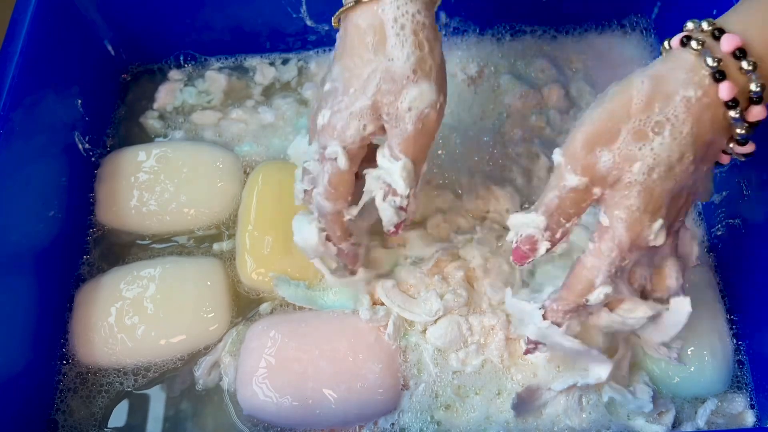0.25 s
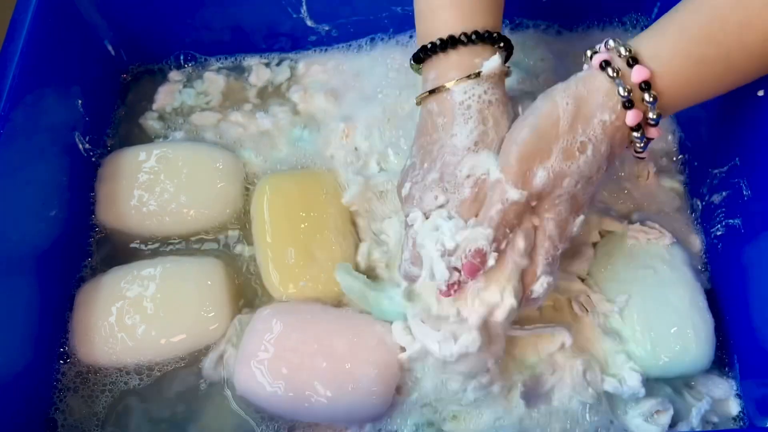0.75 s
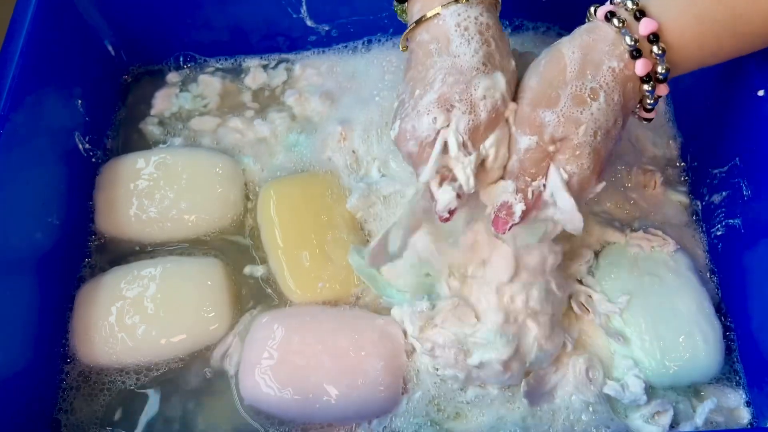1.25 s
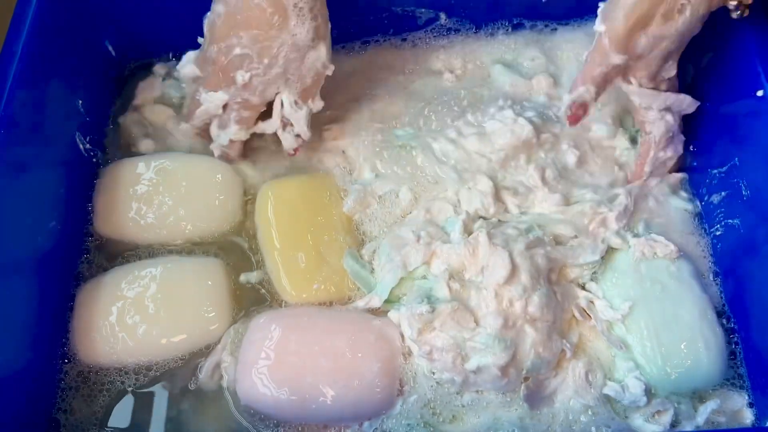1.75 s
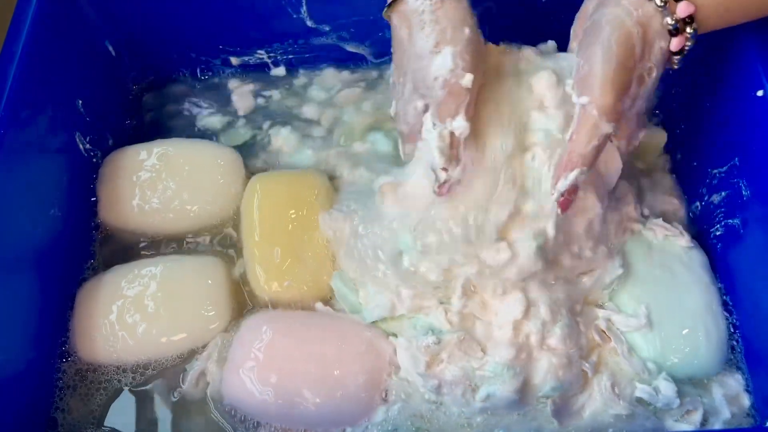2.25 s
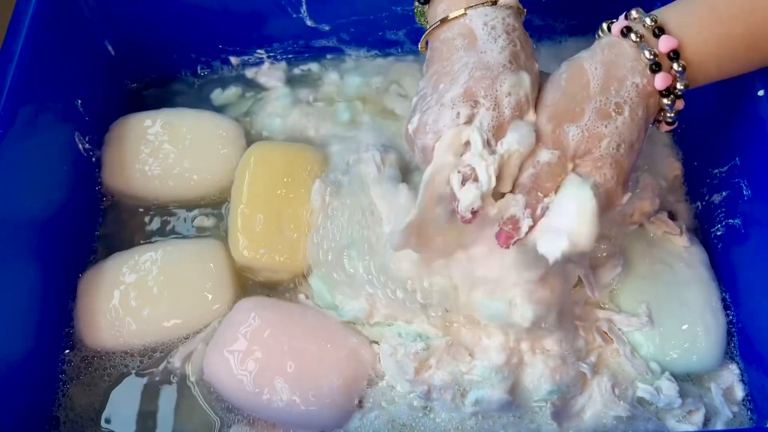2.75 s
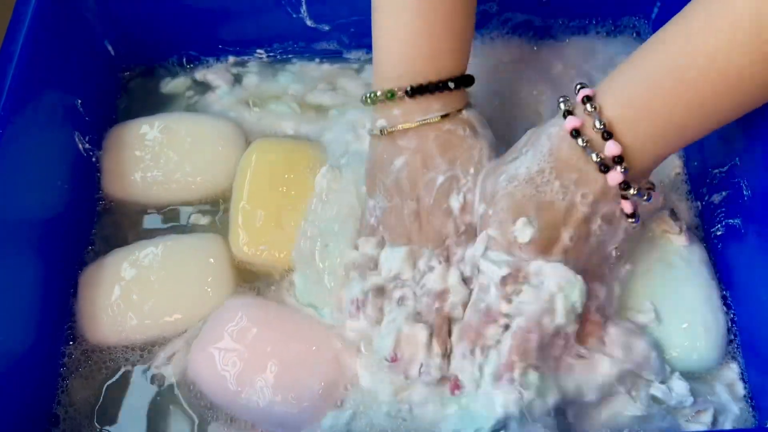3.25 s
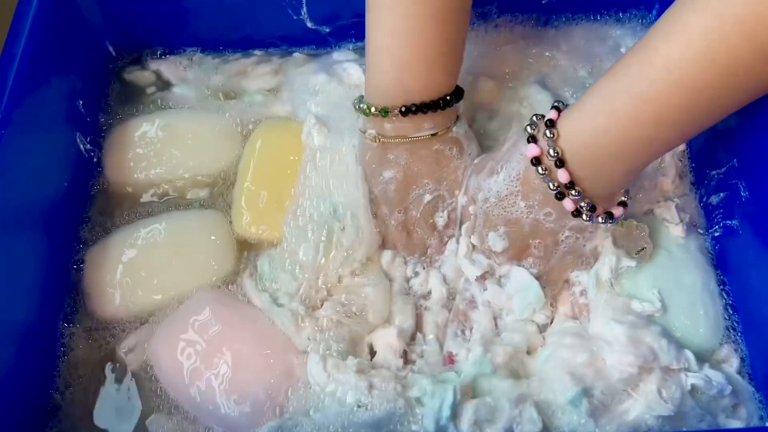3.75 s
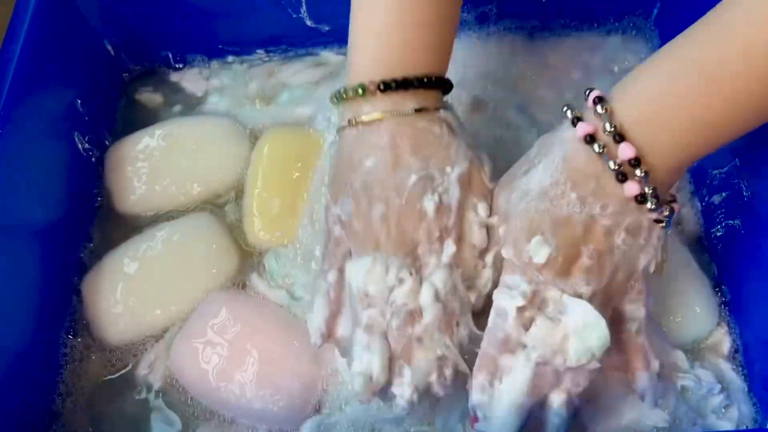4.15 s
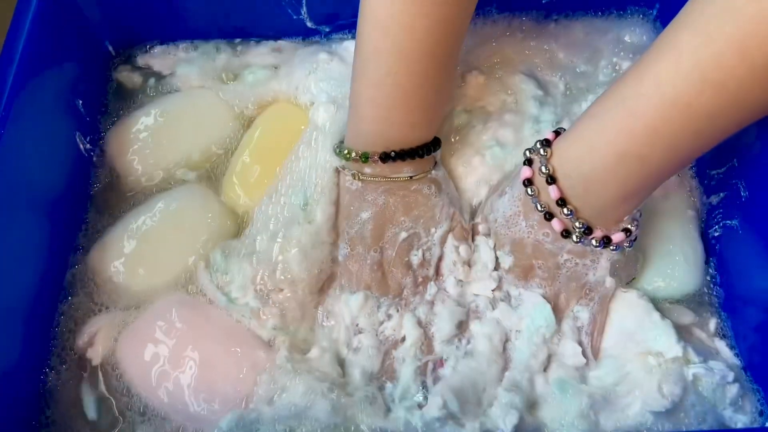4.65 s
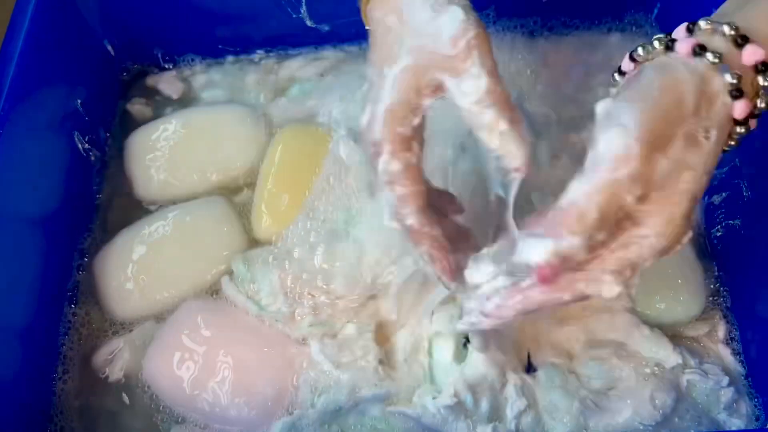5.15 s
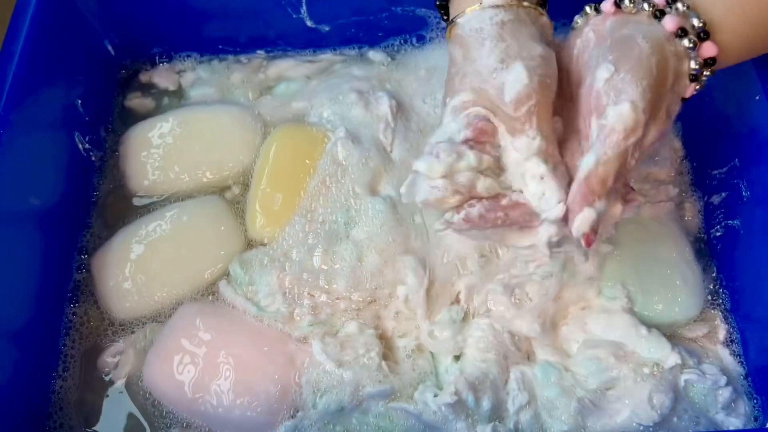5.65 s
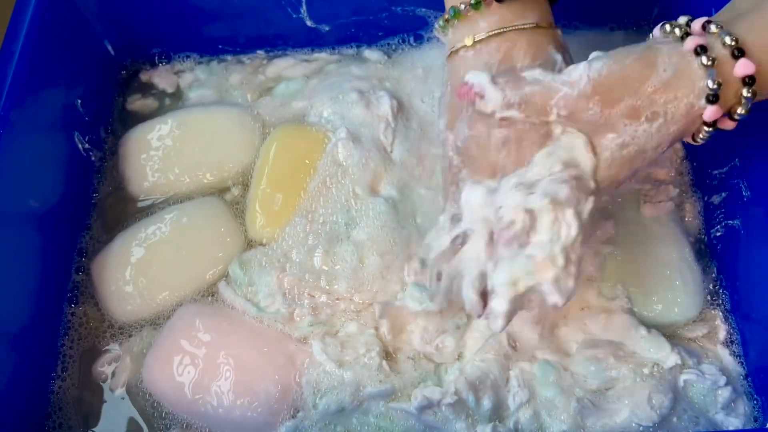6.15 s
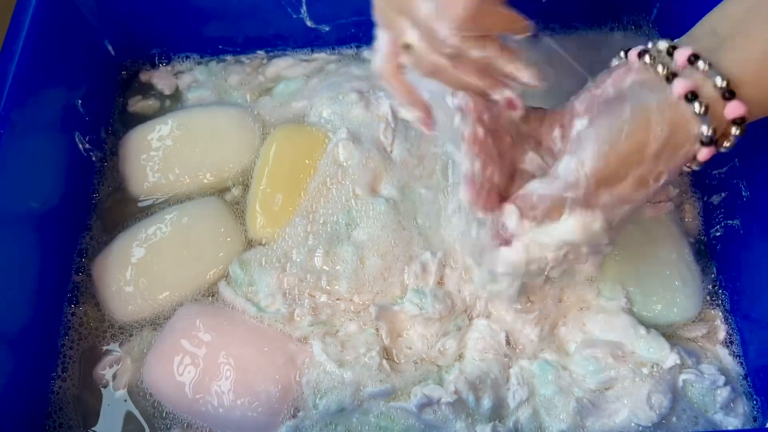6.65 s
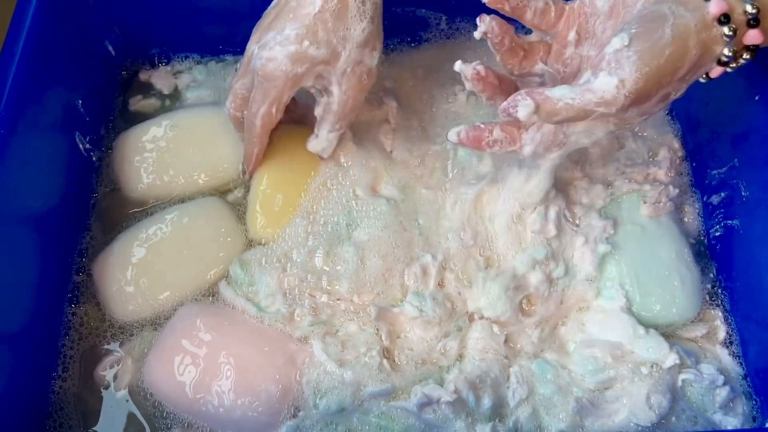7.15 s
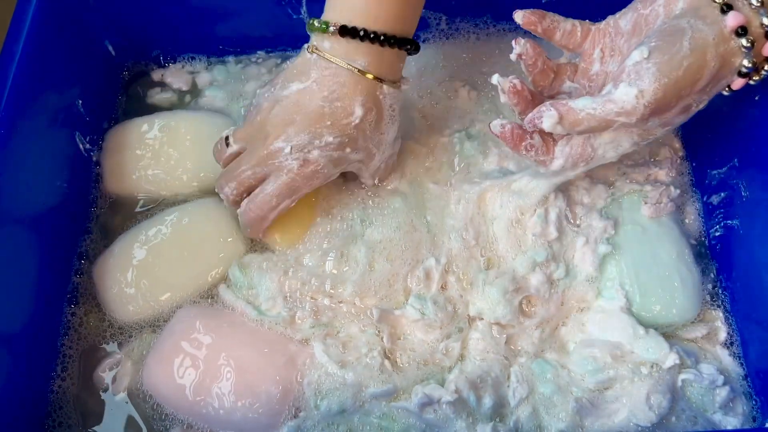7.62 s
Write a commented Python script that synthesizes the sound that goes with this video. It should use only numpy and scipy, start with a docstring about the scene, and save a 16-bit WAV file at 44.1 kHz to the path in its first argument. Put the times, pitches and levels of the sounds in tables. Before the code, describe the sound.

Close stereo sound of soft soap paste being scooped, squeezed and dropped into soapy water. Juicy squishes and brittle foam crackles rise and fall with each grip, peppered with snapping bubbles and hollow glugs. Low thumps and sloshes resound in the plastic tub, strongest near 1.7 and 4.1 seconds. After five seconds it turns drier and quieter, with one last wet burst near 6.8 and a low, soft slide at the end, in a short hard room echo.

```python
"""Hands in a tub of soap suds

Two hands scoop, squeeze and drop soaked soap in a plastic tub of suds, close to the microphone in a small hard room.
Trapped air pops: noise bursts excite resonators. The paste squelches and the foam crackles: clumps of tiny rings.
Large bubbles and two clear lingering notes are damped tones; lumps thud through tub modes; a bar slides late on.
Water sloshes and booms as noise in those resonances and deeper ones, over wall echoes, a faint rumble and hiss."""
import sys
import numpy as np
from scipy import signal
from scipy.fft import rfft, irfft
from scipy.io import wavfile
from scipy.ndimage import uniform_filter1d

SR = 44100
rng = np.random.default_rng(int(sys.argv[2]) if len(sys.argv) > 2 else 0)


def inscribe(sig):
    """Save sig as 16-bit PCM at rate SR to the path in sys.argv[1].

    A 1-D sig is mono; a 2-D sig holds one channel per row.
    Samples are clipped to [-1, 1] before scaling.
    """
    pcm = np.round(np.clip(np.atleast_2d(sig).T, -1, 1) * 32767)
    wavfile.write(sys.argv[1], SR, pcm.astype(np.int16))


N = 347508

# The loudest air pockets bursting; levels are rms over 5 ms, the tick before a lift of 0.5 dB.
# Columns: start_s, gulp_db, pocket_hz, pocket_db, tick_hz, tick_db
LOUD_POPS = [(0.0549, -64, 2490, -59.5, 7690, -55.5), (0.0785, -62.5, 2820, -56.5, 7100, -78),
             (0.4283, -47, 2120, -44, 5510, -51), (0.5133, -56, 2840, -54, 8000, -47.5),
             (0.5622, -51, 1750, -47, 7440, -62), (0.6235, -60, 2600, -44, 6620, -64),
             (0.642, -58.5, 2760, -48.5, 5730, -65), (0.674, -71, 2600, -45, 4800, -59.5),
             (0.7627, -50, 2360, -54.5, 6490, -68), (0.8367, -45.5, 1490, -40.5, 6070, -43.5),
             (0.9409, -52, 1950, -51, 7230, -45.5), (0.9806, -51, 2850, -74.5, 9430, -40.5),
             (1.0156, -46.5, 2680, -50, 9580, -38), (1.109, -53.5, 4420, -48, 7430, -47),
             (1.1397, -65.5, 2910, -57.5, 8160, -37), (1.1485, -54, 2320, -40.5, 7750, -34),
             (1.307, -63, 3340, -56.5, 9970, -50), (1.3854, -89.5, 4500, -54.5, 8070, -49.5),
             (1.4168, -90, 3620, -57.5, 6720, -52), (1.496, -92, 2450, -66.5, 10500, -49.5),
             (1.5925, -39.5, 2750, -35, 6830, -41.5), (1.66, -75, 2430, -58, 5910, -47.5),
             (1.7048, -57, 3100, -43, 10480, -39.5), (1.7681, -43, 3000, -46.5, 5930, -44),
             (1.8908, -49, 1580, -58, 6290, -59.5), (2.19, -53, 2010, -58.5, 7600, -78),
             (2.3322, -64.5, 2180, -59.5, 6950, -63), (2.3646, -58, 2210, -50.5, 8050, -48),
             (2.425, -55, 2530, -52.5, 10320, -47.5), (2.4634, -62, 2010, -52, 9930, -50.5),
             (2.5386, -61, 2980, -48, 5050, -81), (2.7984, -67, 1760, -55, 4610, -80),
             (2.5462, -57.5, 3280, -52, 4970, -82), (2.8217, -73, 1730, -49.5, 6230, -78),
             (2.851, -56, 2580, -50.5, 9240, -47.5), (2.9638, -89, 3320, -59, 9590, -53.5),
             (3.118, -82, 3470, -57.5, 10820, -43.5), (3.1592, -66, 2650, -57, 10820, -47),
             (3.2575, -47, 2470, -43.5, 5280, -51), (3.3374, -59, 3020, -48, 10190, -40),
             (3.4078, -54.5, 2900, -49.5, 9780, -45), (3.508, -71, 3200, -48, 6680, -50),
             (3.7925, -47, 2410, -44.5, 5500, -44), (3.514, -75, 3210, -57, 10700, -44),
             (3.578, -56, 2940, -53, 5360, -62), (3.8752, -69.5, 3400, -65, 7690, -49),
             (3.983, -59, 2040, -72, 10420, -61.5), (4.0994, -88, 3930, -62, 6780, -53.5),
             (4.1281, -32, 2300, -34, 6390, -43.5), (4.1336, -37, 1970, -54, 7060, -46),
             (4.2523, -39.5, 1770, -51, 9280, -50), (4.366, -47.5, 2380, -43.5, 5170, -51.5),
             (4.4372, -41, 1800, -43, 9710, -41.5), (4.399, -67, 2780, -46.5, 5110, -58),
             (4.4461, -47, 2220, -47, 6850, -69), (4.5025, -52.5, 2720, -45, 7550, -45),
             (4.7115, -75, 3130, -60, 6860, -57.5), (4.8158, -43, 1560, -46, 8700, -48.5),
             (4.827, -52, 1620, -47.5, 6440, -59), (4.9085, -45.5, 2520, -41.5, 10400, -41),
             (4.9525, -51, 2600, -37, 8900, -39.5), (5.2102, -72.5, 2660, -69.5, 6120, -63),
             (5.3028, -74.5, 2590, -67.5, 10130, -58.5), (5.3605, -72, 2940, -54.5, 10380, -43.5),
             (5.5324, -93, 2800, -55.5, 6060, -46), (5.6154, -77.5, 2030, -62, 8440, -54),
             (5.6774, -79, 2560, -66, 10400, -50.5), (5.7654, -83.5, 2290, -55, 6430, -58.5),
             (5.828, -90, 3200, -62, 7990, -61.5), (5.8815, -77, 3000, -57.5, 6690, -62.5),
             (5.9385, -75.5, 2550, -43.5, 6950, -42), (5.9463, -61.5, 2360, -50, 6860, -32),
             (6.1583, -89, 2410, -62.5, 9900, -48.5), (6.146, -86, 3240, -67, 9590, -52),
             (6.3174, -82, 3180, -57, 6540, -48.5), (6.3511, -63.5, 1550, -56, 6660, -73),
             (6.5529, -69, 3560, -56, 5960, -69), (6.37, -77, 2810, -68, 8040, -57),
             (6.5608, -82, 4300, -60.5, 9700, -46), (6.6486, -79, 4100, -61, 8830, -53),
             (6.7162, -53, 3750, -50.5, 6900, -52), (6.7243, -50, 1610, -47, 6200, -52),
             (6.8281, -44.5, 3000, -40, 6290, -51), (7.044, -62, 2220, -65, 6500, -76)]

# Lesser pops at chance moments: how often, and their levels relative to the kneading (tick before the same lift)
STRAYS_PER_S, STRAY_SPREAD_DB = 13, 1
STRAY_GULP_DB, STRAY_POCKET_DB, STRAY_TICK_DB = 2.5, 4, 4.0
STRAY_POCKET_HZ, STRAY_TICK_HZ, STRAY_SPREAD_OCTAVES = 2600, 7600, 0.33

# Each grip on the mush: digging in, scooping, pressing, then wiping the paste off the fingers.
# Columns: start_s, closing_s, hold_s, squelch_db, paste_db, foam_db
GRIPS = [(0.0, 0.0023, 0.11, -76, -71.5, -66.5), (0.212, 0.047, 0.14, -65.5, -59, -56.5),
         (0.411, 0.019, 0.11, -55, -58, -55), (0.535, 0.022, 0.42, -56, -55.5, -53),
         (0.956, 0.039, 0.17, -58, -60.5, -57.5), (1.251, 0.031, 0.15, -85, -73, -59.5),
         (1.451, 0.011, .12, -65.5, -64.5, -58.5), (1.591, 0.0084, 0.046, -53, -53.5, -60.5),
         (1.68, 0.015, 0.12, -51, -58.5, -54), (1.864, 0.022, 0.23, -60, -64, -66),
         (2.175, 0.008, 0.018, -63, -66, -81), (2.347, 0.016, 0.1, -65, -63.5, -59.5),
         (2.515, 0.047, 0.087, -65, -63, -62), (2.692, 0.038, 0.077, -60.5, -67, -78),
         (2.85, 0.079, 0.11, -76, -70.5, -63.5), (3.028, 0.0071, 0.39, -66, -66.5, -67),
         (3.164, 0.066, 0.12, -54, -52, -53.5), (3.367, 0.012, 0.036, -61, -60, -59),
         (3.468, 0.021, 0.022, -69, -62, -58.5), (3.544, 0.019, 0.012, -61, -61, -75.5),
         (3.779, 0.016, 0.072, -57.5, -59.5, -57.5), (3.907, 0.022, 0.018, -65.5, -70.5, -76),
         (4.131, .006, .11, -50.5, -55, -58), (4.247, 0.04, 0.082, -50, -53, -56.5),
         (4.43, 0.019, 0.056, -54, -56.5, -55), (4.543, 0.017, 0.044, -67, -69.5, -76.5),
         (4.712, 0.014, 0.091, -68.5, -73.5, -70.5), (4.798, 0.013, 0.18, -61.5, -58.5, -65.5),
         (5.088, 0.032, .02, -75, -72, -77.5), (5.285, 0.017, 0.079, -92, -77, -68.5),
         (5.476, 0.068, 0.016, -84.5, -70, -60), (5.60, .02, 0.2, -110, -78, -72.5),
         (5.852, 0.016, 0.032, -82, -63.5, -61.5), (5.943, 0.006, 0.029, -72.5, -60, -59),
         (6.057, 0.083, 0.099, -90, -72, -61), (6.329, .02, 0.055, -85, -74.5, -68),
         (6.535, 0.011, 0.051, -80, -76.5, -62.5), (6.618, 0.013, 0.067, -84, -78.5, -65.5),
         (6.71, 0.0057, 0.0054, -59.5, -61, -57.5), (6.816, .016, 0.044, -63, -59.5, -74),
         (6.91, 0.019, 0.12, -67.5, -72.5, -90)]
# The mush empties under the hand; all layers die once it opens
GRIP_SAG_DB_PER_S, GRIP_RELEASE_DB_PER_S = 16, 201
RESTING_DB = -96  # floor of each layer when the suds are left alone

# Relative strength of the bubbles by their pitch, in wet squelch, crumbling paste and foam.
# Columns: pitch_hz, level_db
SQUELCH_PITCHES = [(420, 7), (500, -12.5), (610, 13), (800, -0.5), (1050, 2.5), (1300, 1.5)]
PASTE_PITCHES = [(1300, 3.5), (1700, 3.5), (2200, 5.5), (2800, 2.5), (3500, 1.5), (4500, 0)]
FOAM_PITCHES = [(4500, 7.5), (6500, -12), (8500, 4.5), (10500, 5.5), (12000, -5.5)]

# Large bubbles ringing in the suds; level is rms over 5 ms, before a cut of 2 dB.
# Columns: start_s, pitch_hz, level_db
LARGE_BUBBLES = [(0.383, 1390, -56), (0.45, 540, -44), (0.578, 2810, -47), (0.637, 2800, -44),
                 (0.629, 2720, -37.5), (0.8391, 690, -42.5), (0.9115, 1300, -48), (0.4716, 3450, -52),
                 (0.592, 1800, -53), (0.99, 1190, -43.5), (1.058, 1170, -46), (1.071, 1255, -45),
                 (1.5934, 613, -37), (1.6208, 1820, -49.5), (1.7091, 593, -37.5), (1.771, 560, -33.5),
                 (1.8852, 3700, -51), (2.596, 3350, -56), (2.62, 1690, -53), (2.724, 656, -58),
                 (2.7482, 1520, -51.5), (3.2127, 830, -43.5), (3.2317, 780, -43.5), (3.2591, 684, -39.5),
                 (3.5744, 680, -54.5), (3.812, 820, -51), (3.8566, 1950, -57), (4.1503, 900, -43.5),
                 (4.1685, 900, -46.5), (4.2638, 774, -45), (4.2868, 820, -45.5), (4.3187, 1960, -44.5),
                 (4.8615, 1780, -42.5), (4.9597, 619, -50.5), (5.742, 3530, -61.5), (5.7561, 3670, -52.5),
                 (5.764, 2280, -45.5), (5.9477, 2050, -43.5), (6.7314, 1900, -50.5), (6.942, 600, -52.5)]
GLUG_CYCLES = 20  # a large bubble dies by 60 dB in about this many cycles
# Two clear notes that linger, perhaps a bangle ringing; level as for the large bubbles.
# Columns: start_s, pitch_hz, level_db, t60_s
LINGERING_NOTES = [(0.012, 1028, -57.5, 0.49), (6.831, 919, -42.5, 0.27)]

# Lumps and hands landing in the water; level is rms over 5 ms.
# Columns: start_s, pitch_hz, level_db
LANDINGS = [(0.381, 263, -44), (0.429, 280, -36.5), (0.839, 350, -39), (1.011, 230, -38), (1.695, 265, -27),
            (1.718, 224, -30.5), (1.767, 454, -37), (2.428, 250, -57), (3.575, 211, -48),
            (3.794, 245, -49.5), (4.131, 250, -29.5), (4.436, 356, -41), (4.873, 243, -43),
            (6.831, 255.4, -46)]

# A whole bar sliding under the hand: loudest moment, its level, and the time to lose 10 dB on either side
SLIDE_S, SLIDE_DB, SLIDE_FADE_S = 7.46, -72.5, 0.1

# Resonances of the filled tub and its deeper boom; levels are relative.
# Columns: mode_hz, width_hz, level_db
TUB_MODES = [(169.9, 15, 7), (197.2, 29.2, 3), (221.3, 45, 0), (273.8, 27, 1.5), (315, 23, -3),
             (353, 60, -9), (435, 13, -24.5)]
BOOM_MODES = [(62.7, 18, -11), (97.8, 6, 5.5), (123, 8.1, -19)]

# Each shove on the water.
# Columns: start_s, swell_s, slosh_db, boom_db
SHOVES = [(0.0, 0.0032, -70.5, -50.5), (0.375, 0.068, -45, -49), (0.52, 0.089, -52.5, -51.5),
          (0.81, 0.015, -63, -60), (0.995, 0.065, -55, -45.5), (1.205, 0.0097, -64.5, -66),
          (1.59, 0.0079, -50, -69), (1.695, 0.062, -38.5, -42.5), (1.98, 0.13, -55.5, -60),
          (2.38, 0.058, -51.5, -51.5), (2.72, 0.17, -72, -67), (3.18, 0.12, -55, -52.5),
          (3.40, 0.02, -57, -60), (3.55, 0.013, -63, -59), (3.76, 0.071, -51, -57.5),
          (4.128, 0.032, -41.5, -41), (4.29, 0.063, -51, -58), (4.46, 0.035, -54, -64),
          (4.77, 0.057, -50, -56.5), (4.87, 0.023, -58, -53), (5.465, 0.042, -73, -53),
          (5.94, 0.059, -75, -64), (6.03, .07, -88, -64), (6.829, 0.098, -63.5, -63),
          (7.201, 0.25, -64.5, -58.5), (7.399, 0.17, -72.5, -44.5)]
SLOSH_SETTLE_DB_PER_S, BOOM_SETTLE_DB_PER_S = 81.5, 67

# Room echo by frequency.
# Columns: frequency_hz, t60_s, echo_db
ROOM_ECHO = [(95, 0.56, 7), (235, 0.27, -6), (600, 0.32, -9), (1203, 0.26, -12.5), (3000, 0.27, -10),
             (7050, 0.28, -10.5), (12900, 0.055, -6)]

# Relative spectrum of the still room, then its overall rms level.
# Columns: frequency_hz, density_db_per_hz
STILL_AIR = [(20, -30.5), (33, -26), (40, -5.5), (47, 6), (66, -2.5), (80, -13), (98, -3), (130, -7),
             (200, -15.5), (400, -22), (1000, -38.5), (3000, -39.5), (7000, -39.5), (11000, -38.5),
             (14000, -39.5)]
STILL_AIR_DB = -68.5

# Phase lag of the right microphone port.
# Columns: frequency_hz, lag_rad
PORT_LAG = [(0, 0), (780, -0.6), (1030, -0.0), (2500, 0.1), (4310, 1.3), (5680, 6.3), (6720, 6.9),
            (8350, 9.2), (9650, 9.5), (11700, 12.4), (13500, 12.7), (14300, 12.8), (14900, 15.3),
            (16000, 15.8)]
CUTOFF_HZ = 16200


def pops(rows, pocket_q=2.2, tick_q=2.5, tick_lift_db=0.5, size=1500, count=480):
    """Impulsive excitation: a burst ticks, rings its air pocket and gulps low in the paste around it."""
    out = np.zeros(N)
    noises = rng.standard_normal((count, 3, size))
    for (start_s, gulp_db, pocket_hz, pocket_db, tick_hz, tick_db), noise in zip(rows, noises):
        gulp = resonance(rupture(noise[0], tear_s=0.0043, rough=0.31), pocket_hz * 0.39, 640)
        add(out, start_s, band(gulp, 530, 2000), gulp_db)

        air = resonance(rupture(noise[1], tear_s=0.0044, rough=0.14), pocket_hz, pocket_hz / pocket_q)
        add(out, start_s, band(air, 890, 4900, order=1), pocket_db)

        film = resonance(rupture(noise[2], tear_s=0.0034, rough=0.11), tick_hz, tick_hz / tick_q)
        add(out, start_s, band(film, 4300, 11000), tick_db + tick_lift_db)
    return out


def rupture(noise, tear_s, rough):
    """Impulse plus decaying noise: a film gives way with one snap, then a quickly dying tearing."""
    t = np.arange(len(noise)) / SR
    snap = t == 0
    return snap + rough * noise * np.exp(-t / tear_s)


def stray_pops(grip, count=400):
    """Random point process: lesser pops at chance moments, stronger under a harder grip; rows for pops()."""
    squelch_db, paste_db, foam_db = grip
    rows = []
    moments = rng.random((count, 2))
    spreads = np.clip(rng.standard_normal((count, 4)), -2, 2)
    for (when, chance), (strength, wet, pocket, tick) in zip(moments, spreads):
        if chance >= STRAYS_PER_S * N / SR / count:
            continue
        i = int(when * N)
        gulp_db = squelch_db[i] + STRAY_GULP_DB + STRAY_SPREAD_DB * wet
        shared_db = STRAY_SPREAD_DB * strength
        pocket_hz = STRAY_POCKET_HZ * 2 ** (STRAY_SPREAD_OCTAVES * pocket)
        pocket_db = paste_db[i] + STRAY_POCKET_DB + shared_db
        tick_hz = STRAY_TICK_HZ * 2 ** (STRAY_SPREAD_OCTAVES * tick)
        tick_db = foam_db[i] + STRAY_TICK_DB + shared_db
        rows.append((i / SR, gulp_db, pocket_hz, pocket_db, tick_hz, tick_db))
    return rows


def kneading(grip):
    """Superposition of bubble populations: large wet ones, small ones in crumbling paste, fine foam."""
    squelch_db, paste_db, foam_db = grip
    squelch = bubbles(squelch_db, SQUELCH_PITCHES, per_s=520, q=9.0, spread_db=0.5, clump_db=1.0, even_s=0.082)
    paste = bubbles(paste_db, PASTE_PITCHES, per_s=1150, q=10.0, spread_db=0.0, clump_db=3.5, even_s=0.14)
    foam = bubbles(foam_db, FOAM_PITCHES, per_s=1500, q=7.6, spread_db=3.0, clump_db=11.0, even_s=0.3)
    return squelch + paste + foam


def bubbles(level_db, pitches, per_s, q, spread_db, clump_db, even_s, count=18):
    """Shot noise through resonators: tiny bursts in clumps, more of them under harder squeezing."""
    knots = np.arange(0, N, SR // 120)
    clumps = np.interp(np.arange(N), knots, rng.standard_normal(len(knots)))
    # per_s holds at a level of -62 dB, without clumping
    rate = per_s * from_db(.5 * (level_db + 62.0) + clump_db * clumps)
    born = rng.random(N) < np.maximum(rate, 260) / SR
    strength = from_db(spread_db * np.minimum(rng.exponential(1, N), 3.5))
    bursts = born * strength * rng.choice([-1, 1], N)

    # Each burst is dealt to one of the pitches
    dealt = rng.integers(0, count, N)
    low_hz, high_hz = pitches[0][0], pitches[-1][0]
    rings = np.zeros(N)
    for k, hz in enumerate(np.geomspace(low_hz, high_hz, count)):
        gain = from_db(at_hz(pitches, hz)) / np.sqrt(hz)
        rings += gain * resonance(bursts * (dealt == k), hz, hz / q)
    rings = band(rings, low_hz * 0.85, high_hz * 1.28, order=3)
    return from_db(level_db) * steady(rings, even_s)


def gripping():
    """Common modulation: squelch, paste and foam levels in dB all follow the closing and opening hands."""
    shapes = np.array([swell(start_s, closing_s, hold_s, GRIP_RELEASE_DB_PER_S, GRIP_SAG_DB_PER_S)
                       for start_s, closing_s, hold_s, *_ in GRIPS])
    _, _, _, *layers = np.transpose(GRIPS)
    levels = []
    for layer_db in layers:
        gain = together(shapes * from_db(layer_db)[:, None])
        levels.append(20 * np.log10(np.hypot(gain, from_db(RESTING_DB))))
    return levels


def glugs_and_notes(cut_db=-2.0, rise=0.018, swell_cycles=1.0, size=16000):
    """Damped oscillation: large bubbles and two notes, perhaps a bangle, swell and ring, rising slightly in pitch."""
    out, t = np.zeros(N), np.arange(size) / SR
    rings = [(start_s, hz, db, GLUG_CYCLES / hz) for start_s, hz, db in LARGE_BUBBLES]
    for start_s, hz, db, t60_s in rings + LINGERING_NOTES:
        cycles = np.cumsum(hz * (1 + rise * np.minimum(t / t60_s, 1))) / SR
        decay = from_db(-60 * np.minimum(t / t60_s, 5))
        envelope = (1 - np.exp(-cycles / swell_cycles)) * decay
        add(out, start_s, envelope * np.sin(2 * np.pi * cycles), db + cut_db)
    return out


def thuds(damping=0.39, size=9000):
    """Modal excitation: a soft lump pushes a short-lived hollow into the water and shakes the tub."""
    out = np.zeros(N)
    for (start_s, hz, db), noise in zip(LANDINGS, rng.standard_normal((len(LANDINGS), size))):
        push = resonance(rupture(noise, tear_s=0.0042, rough=0.06), hz, hz * damping)
        shaken = sum(from_db(mode_db) * resonance(push, mode_hz, width_hz)
                     for mode_hz, width_hz, mode_db in TUB_MODES)
        add(out, start_s, band(push + shaken, 110, 750), db)
    return out


def sliding_bar(drag_db=-57, drag_late_s=0.04, drag_fade_s=0.11, drag_hz=190, drag_width_hz=65):
    """Friction noise: a slippery bar pushed along gives a soft rub, and just after it a low drag on the floor."""
    t = np.arange(N) / SR - SLIDE_S
    rub_gain = from_db(SLIDE_DB - 10 * np.minimum((t / SLIDE_FADE_S) ** 2, 10))
    drag_gain = from_db(drag_db - 10 * np.minimum(((t - drag_late_s) / drag_fade_s) ** 2, 10))

    friction = rng.standard_normal(N)
    rub = rms_one(band(friction, 540, 980, order=3))
    groan = resonance(resonance(friction, drag_hz, drag_width_hz), drag_hz, drag_width_hz)
    return rub_gain * rub + drag_gain * steady(groan, .05)


def tub_walls(x, level_db=-4.5, die_s=0.0025, low_hz=480, high_hz=4200, size=500):
    """Early reflection: bounces between the tub's side walls cross the ports sideways, in opposite phase."""
    bounces = band(rng.standard_normal(size) * np.exp(-np.arange(size) / SR / die_s), low_hz, high_hz)
    bounces *= np.sqrt(2 * (high_hz - low_hz) / SR / np.sum(bounces ** 2))
    return from_db(level_db) * signal.fftconvolve(x, bounces)[:N] * np.array([[1], [-1]])


def room(x, apart=0.27, size=36000):
    """Reverberation: dense wall echoes, each band with its own decay, differing a little between the ports."""
    t, tail = np.arange(size) / SR, 0
    onset = np.clip(t / .005 - .5, 0, 1)
    edges_hz = 90 * 2 ** np.arange(0, 7.6, .75)
    for low_hz, high_hz in zip(edges_hz, edges_hz[1:]):
        hz = np.sqrt(low_hz * high_hz)
        mid, side = band(rng.standard_normal((2, size)), low_hz, high_hz, order=3)
        echoes = mid + apart * min(hz / 600, 1) * side * np.array([[1], [-1]])
        echoes = echoes * from_db(-60 * t / at_hz(ROOM_ECHO, hz)) * onset
        # Energy in proportion to the bandwidth, then the band's own level
        share = 2 * (high_hz - low_hz) / SR
        gain = np.sqrt(share / np.mean(np.sum(echoes ** 2, axis=1)))
        tail = tail + echoes * gain * from_db(at_hz(ROOM_ECHO, hz, axis=2))
    return signal.fftconvolve(x[None], tail, axes=1)[:, :N]


def water():
    """Forced resonance: every shove makes water slosh and the tub floor boom, each settling at its own pace."""
    slosh = together([from_db(db) * swell(start_s, swell_s, 0, SLOSH_SETTLE_DB_PER_S)
                      for start_s, swell_s, db, _ in SHOVES])
    boom = together([from_db(db) * swell(start_s, swell_s, 0, BOOM_SETTLE_DB_PER_S)
                     for start_s, swell_s, _, db in SHOVES])
    return slosh * stirred(TUB_MODES, even_s=0.23) + boom * stirred(BOOM_MODES, even_s=0.037)


def stirred(modes, even_s):
    """Modal superposition: churning water, as noise, drives a set of tub resonances to an rms near 1."""
    churn = rng.standard_normal(N)
    # Neighbouring modes have opposite sign
    rings = sum((-1) ** k * from_db(db) * resonance(churn, hz, width_hz)
                for k, (hz, width_hz, db) in enumerate(modes))
    return steady(band(rings, modes[0][0] * 0.83, modes[-1][0] * 1.27, order=3), even_s)


def still_air(apart=0.21):
    """Stationary coloured noise: a faint rumble and hiss, partly different in the two ports."""
    colour = from_db(at_hz(STILL_AIR, np.fft.rfftfreq(N, 1 / SR)))
    mid, side = irfft(rfft(rng.standard_normal((2, N))) * colour, N)
    return from_db(STILL_AIR_DB) * rms_one(mid + apart * side * np.array([[1], [-1]]))


def swell(start_s, rise_s, hold_s, release_db_per_s, sag_db_per_s=0):
    """Exponential decay: a movement rises, sags while held and dies away; one value per 32 samples."""
    t = np.arange(0, N, 32) / SR - start_s
    held = np.maximum(t - rise_s, 0)
    sag_db = sag_db_per_s * np.minimum(held, hold_s)
    release_db = release_db_per_s * np.maximum(held - hold_s, 0)
    return np.clip(t / max(rise_s, .001), 0, 1) * from_db(-(sag_db + release_db))


def together(envelopes):
    """Incoherent addition: overlapping movements add in power; gives a gain at every sample."""
    total = np.sqrt(np.sum(np.square(envelopes), axis=0))
    return np.interp(np.arange(N), np.arange(0, N, 32), total)


def add(out, start_s, burst, db):
    """Energy equivalence: lays a burst in with the energy of 5 ms at the given rms level."""
    i = max(round(start_s * SR), 0)
    burst = burst * np.sqrt(.005 * SR / np.sum(burst ** 2))
    out[i:i + len(burst)] += from_db(db) * burst[:N - i]


def resonance(x, hz, width_hz):
    """Damped resonator: two poles, with a gain near 1 at the peak."""
    r = np.exp(-np.pi * width_hz / SR)
    zeros = np.array([1, 0, -1]) * (1 - r * r) / 2
    poles = [1, -2 * r * np.cos(2 * np.pi * hz / SR), r * r]
    return signal.lfilter(zeros, poles, x + 1e-18)


def band(x, low_hz, high_hz, order=2):
    """Band limitation: a Butterworth band-pass."""
    return signal.sosfilt(signal.butter(order, [low_hz, high_hz], "band", fs=SR, output="sos"), x)


def steady(x, span_s):
    """Short-term power normalisation: evens out level changes slower than the span."""
    power = uniform_filter1d(x ** 2, max(int(span_s * SR), 2))
    return x / np.sqrt(np.maximum(power, 0) + np.mean(x ** 2) / 100)


def rms_one(x):
    """Power normalisation: scales to rms 1."""
    return x / np.sqrt(np.mean(x ** 2) + 1e-20)


def at_hz(points, hz, axis=1):
    """Logarithmic pitch scale: reads a column of a table on a log-frequency axis."""
    points = np.array(points)
    return np.interp(np.log(np.maximum(hz, 1)), np.log(points[:, 0]), points[:, axis])


def from_db(db):
    """Logarithmic level: decibels to amplitude gain."""
    return 10 ** (np.asarray(db) / 20)


def scene():
    """Linear superposition: close sounds, their echoes in tub and room, the water and the still air."""
    grip = gripping()
    close = pops(LOUD_POPS + stray_pops(grip)) + kneading(grip) + glugs_and_notes() + thuds() + sliding_bar()
    return close + tub_walls(close) + room(close) + water() + still_air()


def record(dry, port_hz=11600, leak_db=-20.5):
    """Phase lag and low-pass filtering: the right port lags in the treble; both fall off steeply at the top."""
    lag_rad = np.interp(np.fft.rfftfreq(N, 1 / SR), *np.transpose(PORT_LAG))
    right = irfft(rfft(dry[1]) * np.exp(-1j * lag_rad), N)
    pair = np.array([dry[0], right])
    # A little of the unfiltered sound stays beside the low-passed
    muffled = signal.sosfilt(signal.butter(10, port_hz, fs=SR, output="sos"), pair)
    pair = muffled + from_db(leak_db) * pair
    return signal.sosfilt(signal.ellip(10, .1, 80, CUTOFF_HZ, fs=SR, output="sos"), pair)


dry = scene()
out = record(dry)
inscribe(out)
```